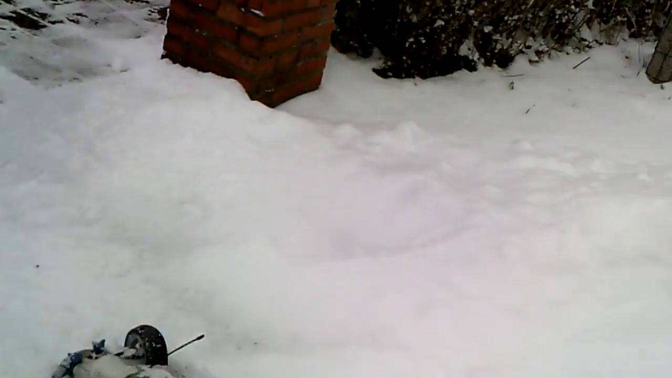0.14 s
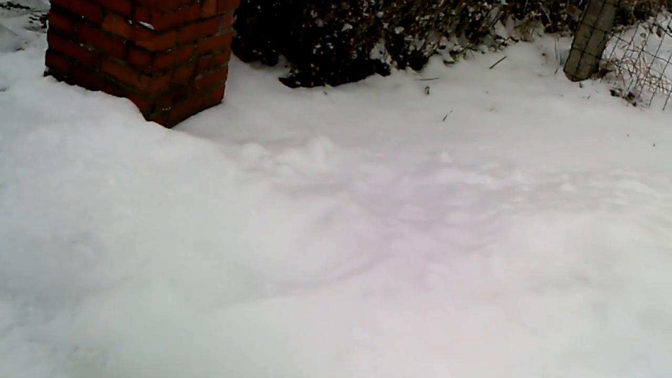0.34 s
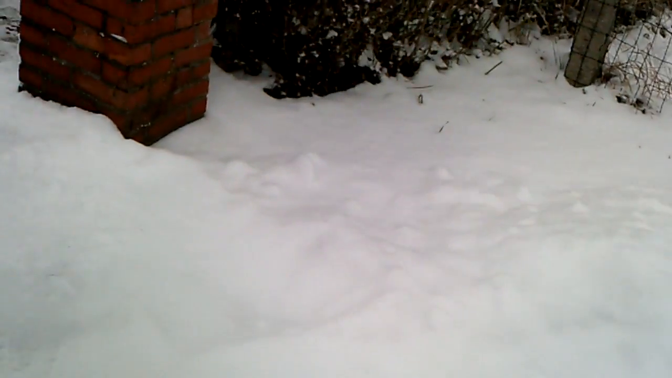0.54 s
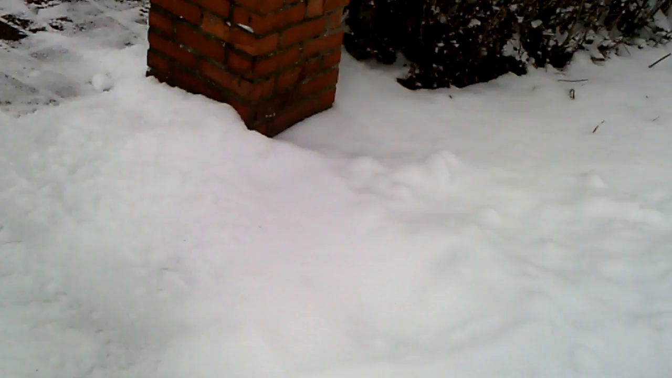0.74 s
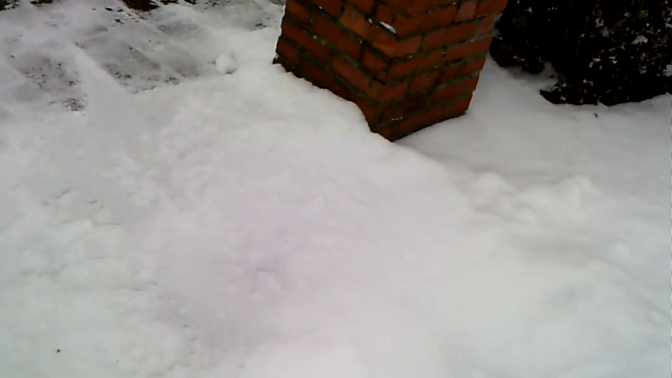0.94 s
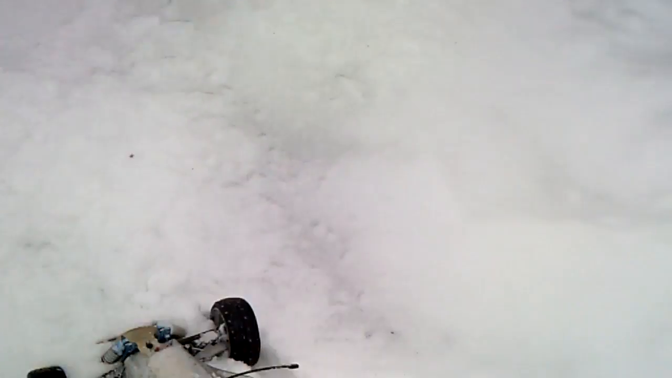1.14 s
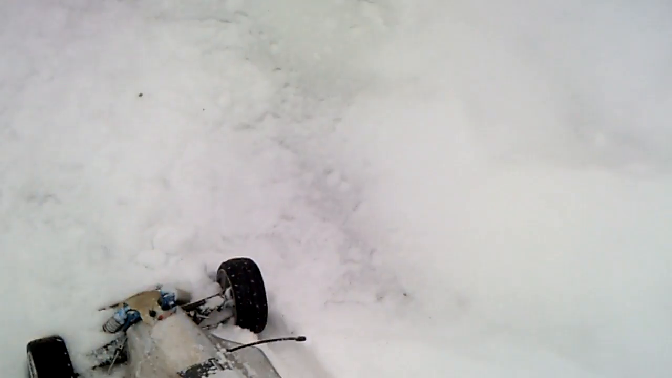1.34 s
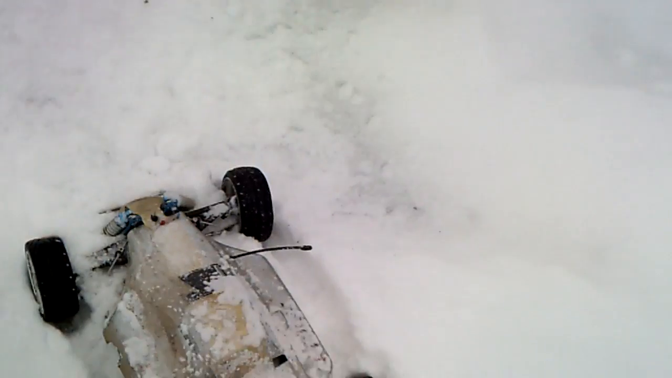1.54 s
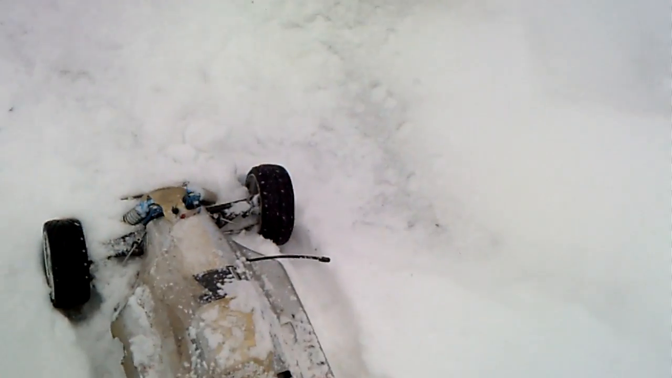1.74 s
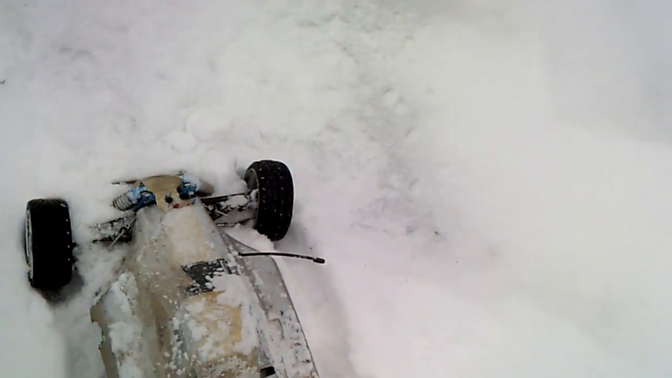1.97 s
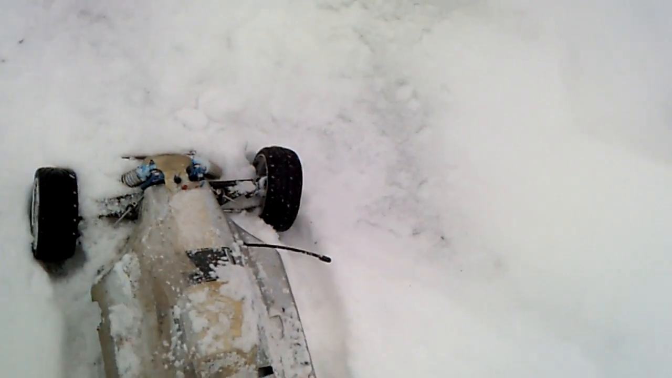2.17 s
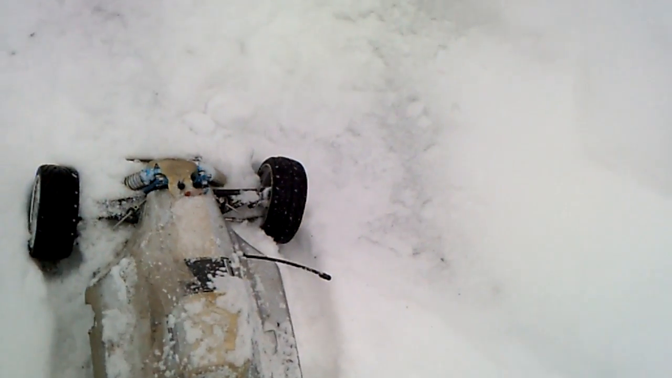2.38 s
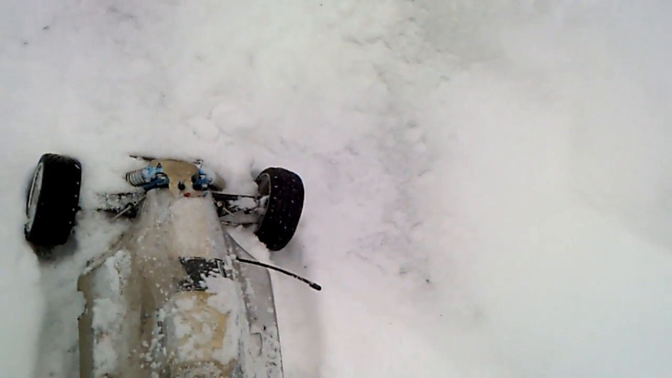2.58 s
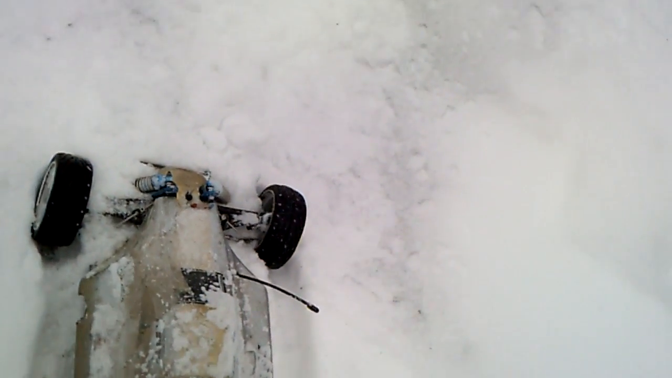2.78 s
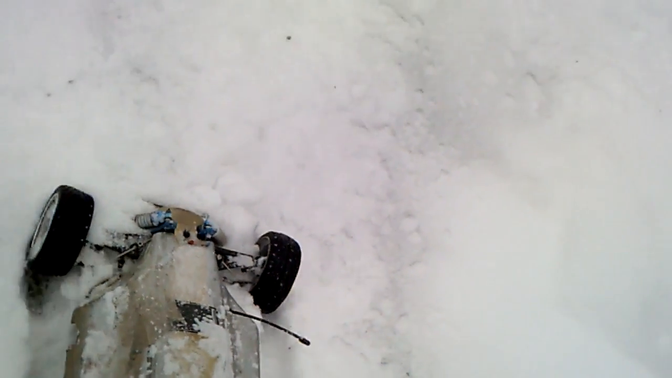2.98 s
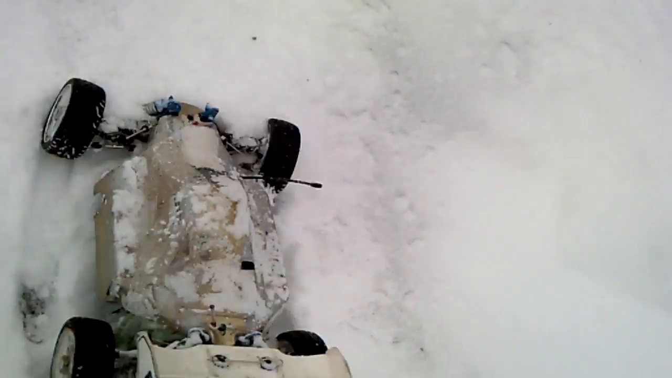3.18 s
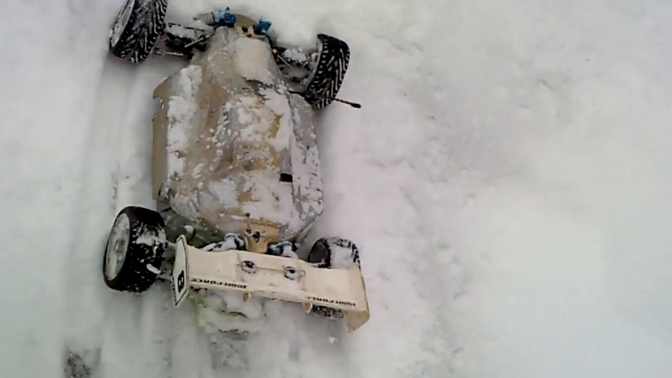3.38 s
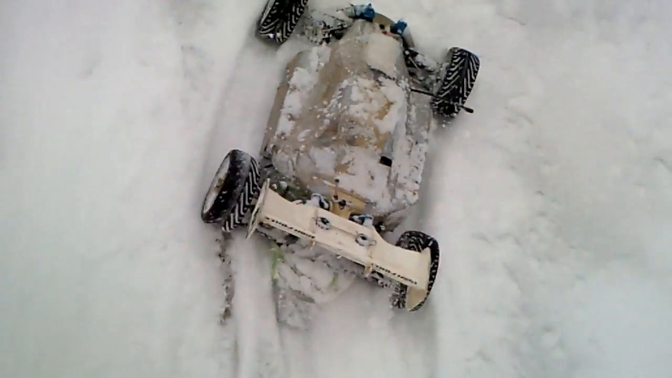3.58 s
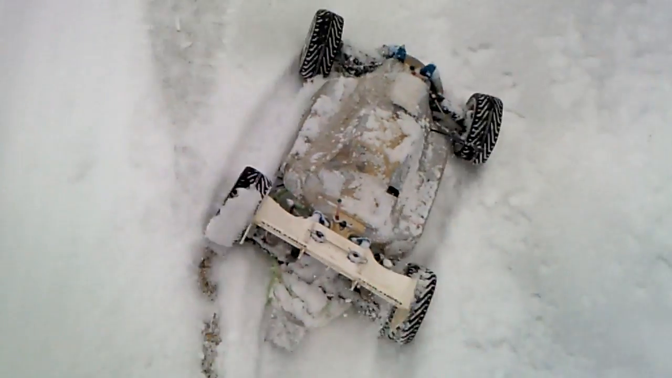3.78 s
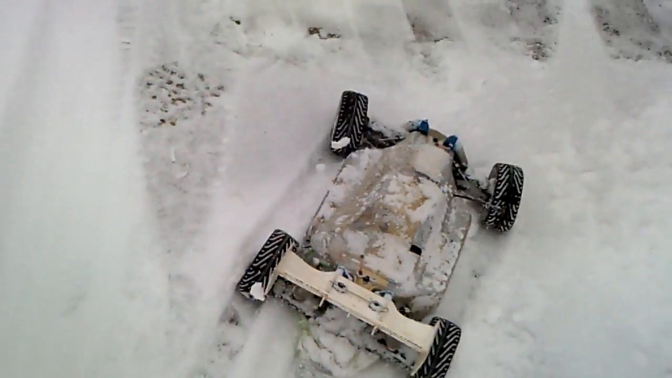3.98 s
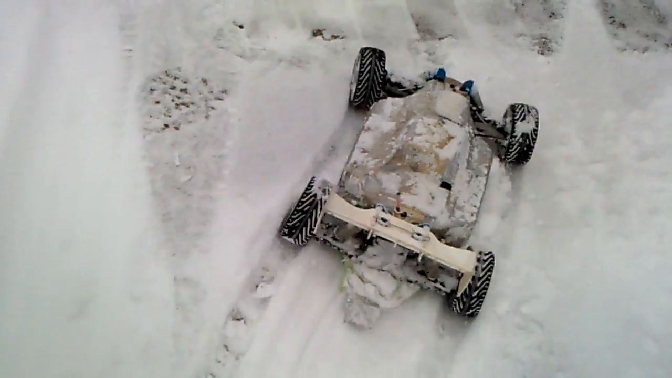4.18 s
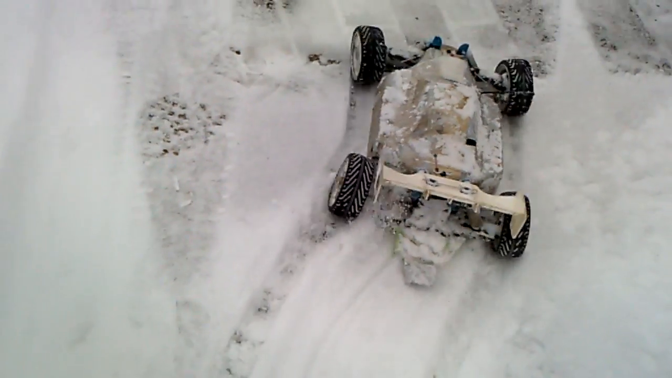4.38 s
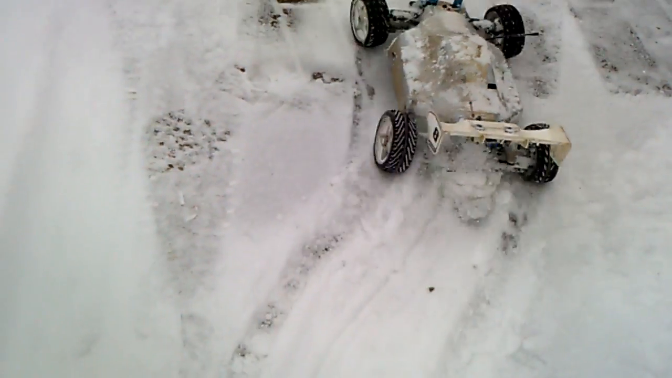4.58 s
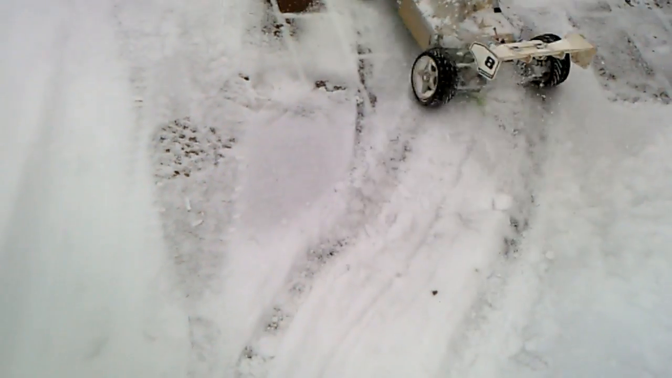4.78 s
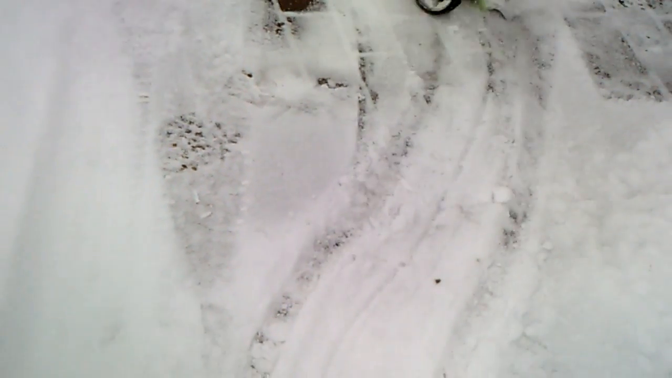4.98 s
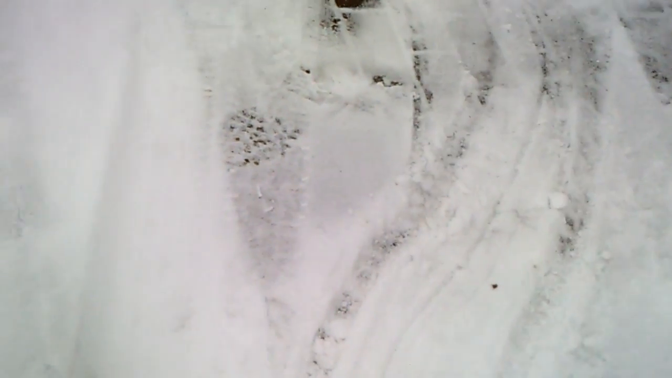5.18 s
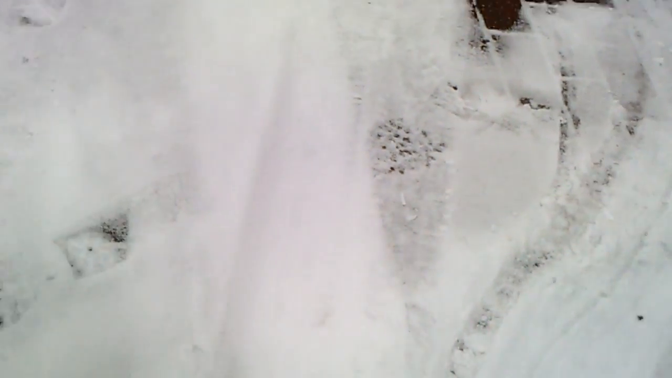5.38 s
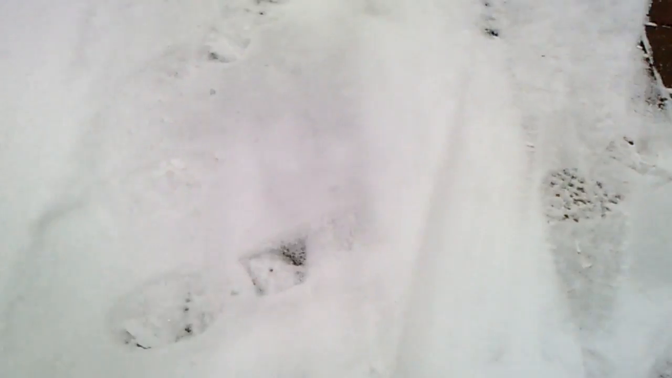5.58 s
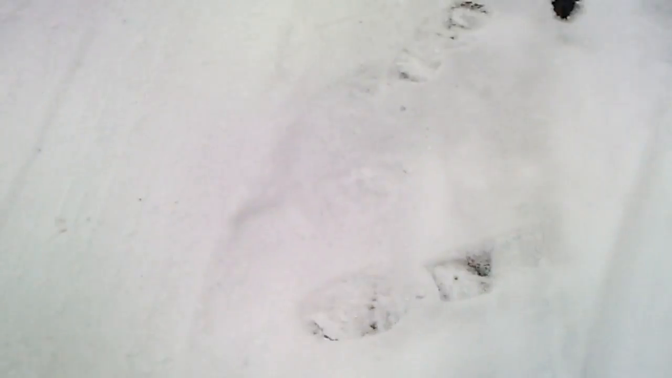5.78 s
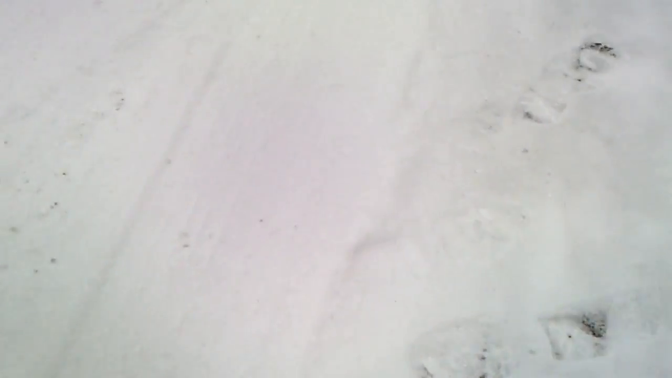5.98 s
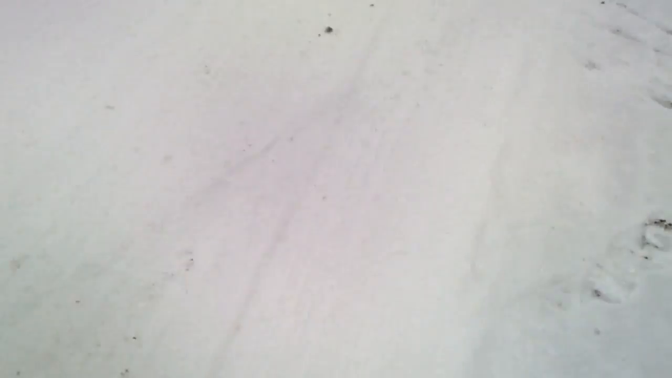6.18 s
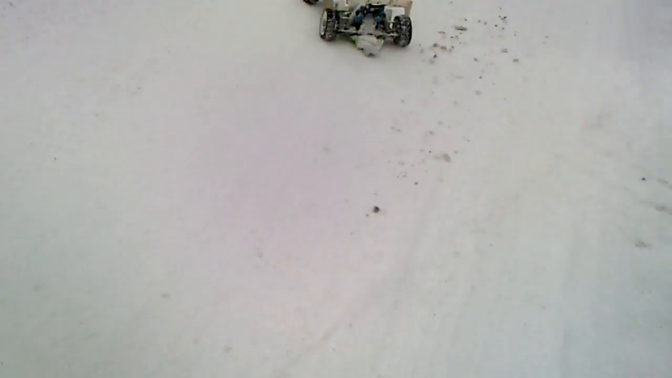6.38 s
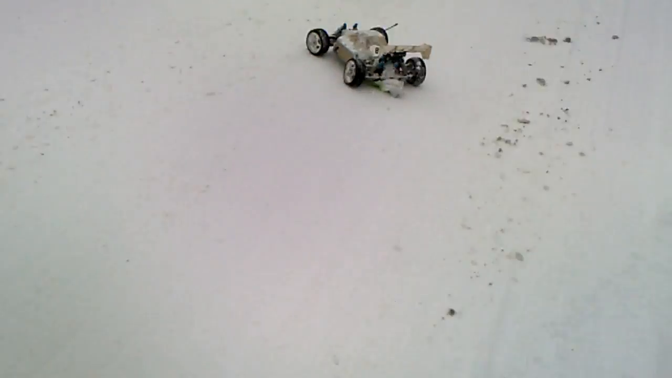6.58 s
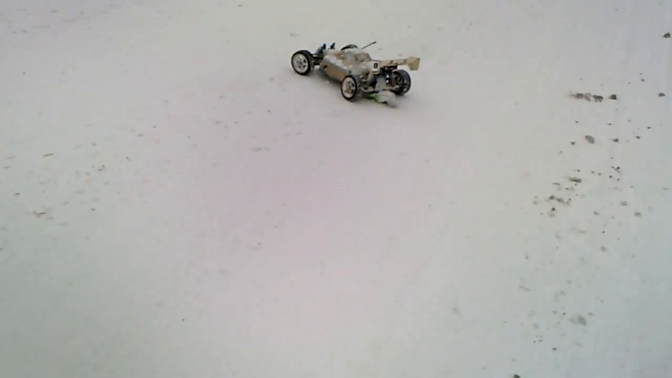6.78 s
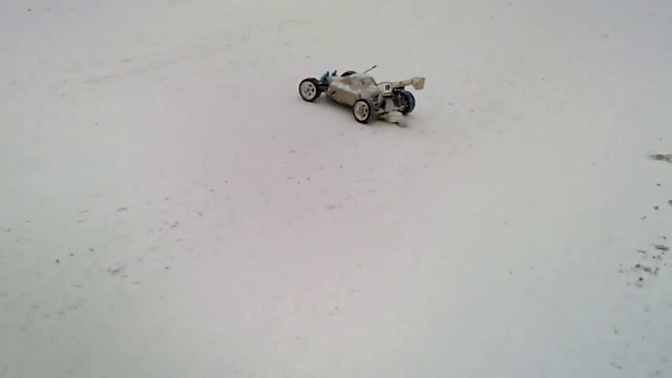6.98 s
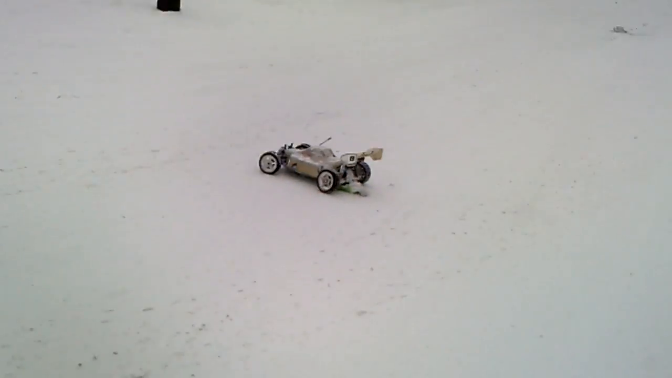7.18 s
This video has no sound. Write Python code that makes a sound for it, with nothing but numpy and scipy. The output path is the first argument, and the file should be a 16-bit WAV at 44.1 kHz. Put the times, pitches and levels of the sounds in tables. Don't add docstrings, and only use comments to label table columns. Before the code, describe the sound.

A small motor whirs down, pauses amid soft handling noises, then revs in gritty, clattering surges before racing off and fading to a thin whine.

```python
import sys
import numpy as np
from scipy import signal
from scipy.fft import rfft, irfft
from scipy.io import wavfile
from scipy.ndimage import uniform_filter1d

SR = 44100
rng = np.random.default_rng(int(sys.argv[2]) if len(sys.argv) > 2 else 0)


def wav_record(signal):
    frames = np.transpose(np.atleast_2d(signal))
    bounded = np.clip(frames, -1, 1)
    quanta = np.round(bounded * 32767).astype(np.int16)
    wavfile.write(sys.argv[1], SR, quanta)


def gain_from_db(level_db):
    decades = np.asarray(level_db, float) / 20
    return 10 ** decades


N = 318843


def rms_one(x):
    return x / np.sqrt(np.mean(x ** 2) + 1e-20)


def in_time(rows):
    s, *columns = np.transpose(rows)
    return [np.interp(np.arange(N) / SR, s, column) for column in columns]


def swells(rows):
    t = np.arange(N) / SR
    total = 0
    for middle_s, half_s, height in rows:
        from_middle = np.clip((t - middle_s) / half_s, -1, 1)
        total = total + height * np.cos(np.pi / 2 * from_middle) ** 2
    return total


def drift(per_s):
    r = np.exp(-32 * np.pi * per_s / SR)
    coarse = rng.standard_normal(N // 16 + 3002)
    slow = signal.lfilter([1], [1, -2 * r, r * r], coarse)[3000:]
    return rms_one(np.interp(np.arange(N) / 16, np.arange(len(slow)), slow))


def colour(x, spectrum):
    hz, db = np.transpose(spectrum)
    log_hz = np.log(np.fft.rfftfreq(N, 1 / SR) + 1)
    return rms_one(irfft(rfft(x) * gain_from_db(np.interp(log_hz, np.log(hz), db)), N))


def resonance(x, hz, width_hz):
    r = np.exp(-np.pi * width_hz / SR)
    top = np.array([1, 0, -1]) * (1 - r * r) / 2
    return signal.lfilter(top, [1, -2 * r * np.cos(2 * np.pi * hz / SR), r * r], x)


def narrow_band(x, hz, width_hz):
    return rms_one(resonance(resonance(x, hz, width_hz), hz, width_hz))


def body(x, modes):
    for hz, width_hz, db in modes:
        x = x + (gain_from_db(db) - 1) * resonance(x, hz, width_hz)
    return rms_one(x)


def add(out, start_s, sound):
    at = round(start_s * SR)
    out[at:at + len(sound)] += sound[:N - at]


def camera_noise():
    # pitch_hz, level_db per Hz
    hiss_colour = [(20, 4), (90, -8), (260, -11), (420, -6), (1400, -6.5), (2400, -11.5), (4600, -13.5),
                   (14500, -12.5)]
    # pitch_hz, width_hz, boost_db
    port = [(3080, 320, 5), (6000, 7100, 5.5)]
    # pitch_hz, width_hz, level_db
    hum_bands = [(50, 18, -73), (98, 6, -75), (166.4, 12, -74), (230.4, 6, -73), (299.6, 14, -77.5),
                 (8650, 120, -77)]
    white = rng.standard_normal(N)
    hum = sum(gain_from_db(db) * narrow_band(white, hz, width_hz) for hz, width_hz, db in hum_bands)
    hiss = body(colour(rng.standard_normal(N), hiss_colour), port)
    return gain_from_db(-52.7 + .5 * drift(3)) * hiss + hum


def rustle():
    # middle_s, half_length_s, level_db
    moves = [(0.532, 0.077, -51), (0.717, 0.15, -53.5), (1.216, 0.076, -76), (1.473, 0.69, -51.5),
             (1.92, 0.42, -59), (2.26, 0.085, -54), (3.076, 0.13, -57), (2.768, .05, -54),
             (3.207, 0.094, -50), (3.309, 0.057, -51), (3.43, 0.08, -46)]
    # pitch_hz, level_db per Hz
    grain_colour = [(150, -43), (250, -7), (381, -0.5), (600, -1), (1070, -0.5), (1220, 1.5), (1350, 0),
                    (4400, -6.5), (12000, -12), (15600, -50), (22000, -120)]
    grain_db = 1.3 * drift(40) + 1.8 * np.minimum(rng.exponential(1, N), 5)
    grains = rng.standard_normal(N) * gain_from_db(grain_db)
    loudness = swells([(s, half_s, gain_from_db(db)) for s, half_s, db in moves])
    return loudness * colour(grains, grain_colour)


def ticks():
    # start_s, peak_db, snap_t60_s (time to fall 60 dB), metal_ring_db
    snaps = [(0.238, -28, 0.01, -11), (0.7437, -36.5, 0.0072, 8.5), (0.757, -43, 0.0094, 5),
             (0.9415, -33, 0.0046, 5), (0.947, -34, 0.0085, -12), (2.283, -41, 0.0069, -7),
             (2.927, -44, 0.0091, -8), (3.189, -27, 0.0033, -12), (3.276, -40, 0.0038, -8),
             (3.493, -32, 0.01, -17), (3.526, -38, 0.012, -20), (5.0059, -14.5, 0.0073, -25)]
    # pitch_hz, level_db, t60_s
    metal = [(6150, -28, .09), (6500, -12, .025), (7400, -19, .035), (8150, -14, .035), (11850, -20, .05),
             (13250, -10, .035)]
    out, t = np.zeros(N), np.arange(3000) / SR
    bright = signal.butter(2, [3000, 12800], "band", fs=SR, output="sos")
    for start_s, db, t60, ring_db in snaps:
        burst = rng.standard_normal(len(t)) * gain_from_db(-60 * t / t60)
        sound = signal.sosfilt(bright, burst * np.minimum(t / 0.001, 1))
        for hz, mode_db, mode_t60 in metal:
            luck_db = rng.normal(0, 2.5)
            shake = 1.5 * np.cumsum(rng.normal(0, .06, len(t)))
            level = gain_from_db(ring_db + mode_db + luck_db - 60 * t / mode_t60)
            sound += level * np.sin(2 * np.pi * hz * t + shake)
        add(out, start_s, gain_from_db(db + 9.0) * sound)
    return out


def knocks(events, ring_s, snap_share, low_hz):
    out, t = np.zeros(N), np.arange(1000) / SR
    wall = signal.butter(2, [low_hz, 3200], "band", fs=SR, output="sos")
    for start_s, db, hz in events:
        ring = np.sin(2 * np.pi * hz * t) * np.exp(-t / ring_s)
        snap = signal.sosfilt(wall, rng.standard_normal(len(t)) * np.exp(-t / .0012))
        add(out, start_s + 0.00164, gain_from_db(db) * (ring + snap_share * snap / np.abs(snap).max()))
    return out


def hand_knocks():
    # start_s, peak_db, pitch_hz
    bumps_of_hand = [(0.76, -40, 1080), (0.837, -39, 1080), (0.872, -49, 570), (0.935, -46, 1740),
                     (1.013, -37.5, 1750), (1.094, -34, 398), (1.13, -44, 1000), (1.378, -31, 1040),
                     (1.436, -42, 1670), (1.48, -44, 1710), (2.046, -45, 1020), (2.385, -43, 950),
                     (2.97, -39.5, 790), (2.997, -43, 884), (3.178, -36, 1140), (3.358, -50, 900),
                     (3.13, -43, 793), (3.29, -44, 498), (2.78, -43, 409), (6.195, -29, 1080)]
    return knocks(bumps_of_hand, ring_s=.0024, snap_share=1.1, low_hz=280)


def drive_jolts():
    # start_s, peak_db, pitch_hz
    slack = [
        (0.005, -31, 2250),
        (3.4979, -31, 2700),
        (3.5279, -25, 2663),
        (3.5493, -26, 2640),
        (3.6142, -28, 2400),
        (3.6406, -31, 2420),
    ]
    return knocks(slack, ring_s=.002, snap_share=1.2, low_hz=800)


def panels():
    # middle_s, half_length_s, pitch_hz, width_hz, level_db
    loose = [
        (5.58, .2, 1090, 220, -37),
        (5.88, .22, 1200, 260, -37),
        (4.42, .1, 680, 160, -36),
        (4.8, .2, 720, 220, -36),
        (.08, .07, 650, 200, -38),
        (3.57, .07, 2650, 400, -39),
        (3.23, .09, 750, 400, -48),
        (6.62, .2, 4200, 200, -56),
        (6.9, .35, 5400, 250, -58),
        (6.15, .12, 1700, 400, -47),
    ]
    shaking = rng.standard_normal(N) * gain_from_db(2.0 * drift(35))
    out = np.zeros(N)
    for s, half_s, hz, width_hz, db in loose:
        out += swells([(s, half_s, gain_from_db(db))]) * narrow_band(shaking, hz, width_hz)
    return out


def drive():
    # start_s, mesh_hz, whine_db (tooth load), clatter_db (wheel effort), shaft_wobble_db
    stopping = [(0, 690, -41, -38, -7), (.025, 877, -25, -37.5, -6), (.07, 2147, -35.5, -32, 4.5),
                (.16, 1927, -48, -36, -3), (.185, 1538, -31.5, -33.5, -3), (.215, 1367, -44, -38.5, 8),
                (.24, 972, -28.5, -38.5, 9), (.29, 584, -56, -44.5, -11), (.37, 448.5, -85, -62, -9)]
    creeping = [(3.05, 452, -90, -60, -12), (3.12, 448, -78, -55, -12), (3.135, 448, -80, -52, -12),
                (3.172, 448, -78, -51, -12), (3.182, 448, -78, -45, -12), (3.23, 444, -80, -46.5, -12),
                (3.29, 438, -80, -47.5, -12), (3.345, 420, -85, -59, -12), (3.362, 411.6, -85, -48, -12)]
    digging_in = [(3.402, 384.7, -90, -52, -9), (3.46, 399.9, -54, -43, -3), (3.475, 619.8, -38, -41, -3),
                  (3.49, 990, -34, -37, -9), (3.501, 960, -26, -33, -9), (3.512, 701.5, -36, -37, -9),
                  (3.528, 1080, -30.5, -33, -11), (3.538, 830, -26, -33.5, -14),
                  (3.56, 1345, -31.5, -30.5, -6), (3.6, 1880, -33.5, -30, 4), (3.632, 1830, -34, -35, 0),
                  (3.681, 1386, -72, -37.5, -6), (3.72, 1047, -31, -40.5, -23)]
    second_try = [(3.77, 710.4, -32, -36.5, -18), (3.862, 541.5, -35, -39.5, -13),
                  (3.899, 847, -25.5, -33.5, -18), (3.938, 1523, -26, -33, -6), (4.039, 1648, -27, -34, -5),
                  (4.065, 1443, -31.5, -35.5, 4), (4.085, 1197, -46, -40, 5), (4.11, 1000, -35.5, -41.5, 5),
                  (4.15, 629, -28.5, -43, -2), (4.2, 594, -30, -39.5, -12)]
    wheelspin = [(4.219, 892, -26.5, -34, -3), (4.299, 1900, -30, -31.5, 6), (4.33, 2480, -38.5, -30, 7.5),
                 (4.38, 2583, -40, -34.5, -3), (4.449, 2410, -42, -33.5, 3.5),
                 (4.49, 2560, -31.5, -28.5, -2), (4.503, 2640, -35, -28.5, -1),
                 (4.528, 3710, -58, -27.5, -3), (4.612, 3423, -46, -31.5, 1.5),
                 (4.661, 2893, -74, -31.5, -10)]
    breaking_free = [(4.701, 2551, -38, -31, -2), (4.76, 2646, -41, -32, -4),
                     (4.829, 2952, -35, -32.5, -4.5), (4.89, 3006, -40, -30.5, -6.5),
                     (4.929, 2516, -44, -31.5, 2), (4.965, 2119, -37, -32, -2),
                     (4.995, 1653, -40, -33, -12), (5.02, 1293, -36, -34.5, -20),
                     (5.077, 1157, -28.5, -32.5, 2)]
    turning = [(5.11, 1508, -33, -30.5, -21), (5.15, 2090, -32.5, -31.5, 4.5), (5.18, 1455, -36, -33, -1.5),
               (5.205, 1463, -39, -33.5, -13), (5.24, 1007, -31.5, -38, -10), (5.279, 967.4, -34, -38, -15),
               (5.342, 1045, -30, -38, -11), (5.365, 1035, -21.5, -36, -3)]
    dash = [(5.4, 1841, -32, -30, -4.5), (5.44, 2484, -33.5, -34.5, -1.5), (5.5, 3580, -61, -32, -4),
            (5.581, 4184, -58, -34.5, 1.5), (5.72, 4423, -47, -33, -2.5), (6.05, 3894, -64, -38.5, 4),
            (6.075, 3486, -67, -40, -5), (6.271, 3210, -78, -47, -2), (6.36, 1475, -81, -50, -21)]
    cruising_off = [(6.42, 1298, -68, -49.5, -9), (6.45, 1394, -70, -44.5, -4.5),
                    (6.49, 1501, -45.5, -42, -13), (6.57, 1486, -50.5, -44, -4),
                    (6.72, 1288, -49.5, -45, 6), (6.79, 1117, -46.5, -46.5, -2),
                    (6.971, 1052, -51.5, -46, -3), (7.099, 1082, -47.5, -43, -1),
                    (7.23, 1040, -41.5, -47, -14)]
    return in_time(np.vstack([stopping, creeping, digging_in, second_try, wheelspin,
                              breaking_free, turning, dash, cruising_off]))


def whine(turns, db, rough, width_hz, wobble_db):
    steady = gain_from_db(wobble_db * drift(47.0)) * np.exp(.35j * drift(22))
    flutter = (drift(width_hz) + 1j * drift(width_hz)) / np.sqrt(2)
    mix = np.sqrt(1 - rough) * steady + np.sqrt(rough) * flutter
    return np.sqrt(2) * gain_from_db(db) * np.imag(mix * np.exp(2j * np.pi * turns))


def gears(mesh_hz, mesh_db, shaft_db):
    # pitch_hz, level_db
    radiation = [(200, -37), (380, -20.5), (600, -10), (750, -9.5), (1150, -9.5), (1900, -1), (2300, -3),
                 (3300, -36)]
    # pitch_hz, width_hz, boost_db
    gearbox = [(807, 62, 6.5), (1020, 100, 4), (1400, 220, 6.5), (2000, 88, 7.5), (2524, 56.2, 5.5)]
    # middle_s, half_length_s, change_db
    mesh_sings = [(.004, .012, -10), (.048, .014, -12), (.033, .008, 4), (.21, .018, -8), (.228, .012, 5),
                  (.262, .02, 6), (3.482, .01, -6), (3.514, .01, -8), (3.56, .014, -8), (4.225, .012, -6),
                  (4.315, .02, -6), (4.965, .04, 5), (5.195, .025, 4), (5.43, .015, 3), (5.46, .02, -8),
                  (6.56, .06, 2)]
    double_sings = [(5.225, 0.048, 17), (5.29, .04, 2), (3.55, 0.024, -8), (3.605, .03, 16), (3.88, .03, 4),
                    (5.33, 0.055, 4.5), (6.56, 0.11, 14), (3.98, 0.11, -2), (5.08, .05, 3),
                    (7.15, 0.095, 2), (3.8, 0.081, 9)]
    half_sings = [(5.52, 0.05, 8), (5.6, .06, 8), (5.75, 0.13, -10), (4.515, .025, -8), (4.6, 0.06, 4),
                  (6, 0.046, 3), (4.27, 0.041, 0), (3.58, .06, 2), (5.92, .12, -10), (6.01, .06, -8)]
    quarter_sings = [(4.33, .04, -1), (4.43, .1, 0), (4.94, 0.07, 6.5), (4.02, 0.046, -2), (4.25, 0.05, 7),
                     (6.5, 0.061, 3), (6.66, 0.035, 6), (3.5, .04, 4), (5.52, 0.065, -12), (5.8, 0.15, 5),
                     (4.62, 0.088, 1.5), (6.6, 0.24, 1.5), (4.75, 0.1, 7.5)]
    three_quarter_sings = [(4.81, 0.096, 16), (4.58, 0.14, -20), (6.445, 0.041, 34), (6.52, 0.036, 10),
                           (6.6, .06, -2), (6.2, 0.024, 14)]

    rough = np.clip((mesh_hz - 1600) / 2600, .14, .97)
    sweep = np.abs(uniform_filter1d(np.gradient(np.log2(mesh_hz)) * SR, size=900))
    judder = (0.011 + .004 * np.minimum(sweep, 9)) * drift(40)
    turns = np.cumsum(mesh_hz * (1 + judder)) / SR

    double_db = mesh_db - 6.5 - 2.2 * sweep + 2.5 * drift(8) + swells(double_sings)
    double_db = double_db + 0.21 * (mesh_db + 16.5)
    double_db = double_db - 8 * np.log2(np.maximum(mesh_hz / 1000, 1))

    mesh_db = mesh_db - 3.5 + swells(mesh_sings)
    for top_hz, width_hz, boost_db in gearbox:
        mesh_db = mesh_db + boost_db / (1 + ((mesh_hz - top_hz) / width_hz) ** 2)

    radiation_hz, radiation_db = np.transpose(radiation)

    def fraction_db(share, order_db, sings):
        heard_db = np.interp(np.log(mesh_hz * share), np.log(radiation_hz), radiation_db)
        return shaft_db + order_db + swells(sings) + heard_db + 2.0 * drift(15.6)

    quarter_db = fraction_db(1 / 4, -2.5, quarter_sings)
    half_db = fraction_db(1 / 2, -5, half_sings)
    three_quarter_db = fraction_db(3 / 4, -13.5, three_quarter_sings)

    out = whine(turns, mesh_db, rough, width_hz=170, wobble_db=2.5)
    out += whine(2 * turns, double_db + .6, .08 + .8 * rough, width_hz=110, wobble_db=2.5)
    out += whine(3 * turns, double_db - 16.5, 0.27, width_hz=190, wobble_db=7.0)
    out += whine(4 * turns, double_db - 11, 0.79, width_hz=120, wobble_db=5.0)
    out += whine(turns / 2, half_db + .6, .7 * rough, width_hz=70, wobble_db=3.0)
    out += whine(turns / 4, quarter_db + 5.5, 0.77 * rough, width_hz=64, wobble_db=3.5)
    out += whine(3 * turns / 4, three_quarter_db, .8 * rough, width_hz=90, wobble_db=3.5)
    return out, turns


def clatter(turns, surge_db, grit_db, shaft_depth):
    sizes = gain_from_db(grit_db * np.minimum(rng.exponential(1, N), 5))
    pulse = 1 + shaft_depth * np.cos(2 * np.pi * turns / 4)
    return rng.standard_normal(N) * sizes * gain_from_db(surge_db) * pulse


def shell(hits, count, swing_db, share):
    rings = 0
    for hz in 450 * 26 ** ((np.arange(count) + rng.random(count)) / count):
        ring = rms_one(resonance(hits, hz, 25 + 0.033 * hz))
        rings = rings + hz ** .25 * gain_from_db(swing_db * drift(3.05)) * ring
    return np.sqrt(1 - share) * rms_one(hits) + np.sqrt(share) * rms_one(rings)


def buggy():
    # start_s, ring_hz (a gliding noisy band), ring_db over bright clatter,
    # turned_away 0-1
    pose = [(0, 3690, 8, 0), (.3, 4120, -3, 0.28), (3.4, 4550, -19, 0.17), (3.6, 5148, 11.5, 0.16),
            (3.75, 3903, 7.5, 0), (4.0, 4884, 0, 0.22), (4.39, 5247, 5.5, 0.09), (4.69, 5075, 1.5, 0.27),
            (4.92, 4623, 7, 0.19), (5.13, 4220, -3, 0.69), (5.44, 3380, -8, 0.62), (5.55, 3863, 5, 0.85),
            (5.8, 4128, 7.5, 0.85), (6.02, 4112, 4.5, 0.84), (6.22, 4080, -38, 0.61),
            (6.48, 4195, -9, 0.77), (6.72, 4168, 2, 0.74), (7.23, 4526, -13, 0.55)]
    # middle_s, half_length_s, change_db of effort
    bumps = [(.04, 0.037, 2.5), (3.665, 0.012, 2.5), (4.4, 0.054, 0), (5.045, 0.031, -4.5),
             (6.04, 0.018, 2.5), (6.065, .015, -7.5), (6.09, .015, 3.5), (6.135, 0.019, 2.5),
             (6.18, 0.017, -5.5), (6.205, 0.019, 2), (6.26, 0.025, 2.5)]
    # middle_s, half_length_s, change_db
    muffled = [
        (3.25, .2, -10),
        (6.6, 0.26, 2.5),
        (6.35, .1, 3),
        (5.75, 0.37, 0.5),
        (7.8, 0.22, 1),
        (4.15, .08, -0.5),
        (3.8, .08, -0.5),
    ]
    # pitch_hz, level_db per Hz
    facing_colour = [(180, -23.5), (300, -14), (414, -26), (651, -5), (790, -5.5), (1580, -5), (1980, -14),
                     (2220, -10.5), (3600, -11.5), (4820, -5.5), (5940, -3), (7820, -4.5), (14200, -16.5)]
    # pitch_hz, level_db per Hz
    away_colour = [(180, -36), (300, -21), (471, -14), (639, -8), (867, -12), (1100, -2), (1570, -15),
                   (1850, -9), (2240, -11), (2630, -24), (4060, -13), (5000, -17), (7720, -14),
                   (14200, -23)]
    # pitch_hz,
    # width_hz, change_db
    clatter_modes = [(650, 42, 1), (1080, 33, 1), (1774, 44, 3), (7755, 480, 6.5), (10900, 1040, 4.5),
                     (11450, 570, -13)]
    # start_s, level_db
    whistle = [
        (3.8, -81),
        (3.898, -33.5),
        (4.9, -52),
    ]

    mesh_hz, mesh_db, low_db, wobble_db = drive()
    low_db = low_db + swells(bumps)
    out, turns = gears(mesh_hz, mesh_db, low_db + wobble_db)

    ring_hz, ring_db, away = in_time(pose)
    surge = drift(59)
    bright_db = low_db - 11 + 2.5 * np.log2(mesh_hz / 1500) + 5 * away + swells(muffled)
    hits = clatter(turns, 0.7 * surge + 1.6 * drift(60), grit_db=1.8, shaft_depth=0.15)
    hits = shell(hits, count=44, swing_db=6.0, share=.36)
    side_on, tail_on = colour(hits, facing_colour), colour(hits, away_colour)
    for kind, db in (("low", low_db), ("high", bright_db + 3.0)):
        split = signal.butter(4, 2800, kind, fs=SR, output="sos")
        facing = rms_one(signal.sosfilt(split, side_on))
        tail = rms_one(signal.sosfilt(split, tail_on))
        out += gain_from_db(db) * body((1 - away) * facing + away * tail, clatter_modes)

    ring_turns = np.cumsum(ring_hz * (1 + .05 * (1 - away) * drift(25))) / SR
    ring_level_db = bright_db + ring_db - 5.0 + 1.8 * surge
    out += whine(ring_turns, ring_level_db, 0.9, width_hz=230, wobble_db=0)

    whistle_db, = in_time([(3.75, -46.5)] + list(whistle) + [(4.95, -99)])
    whistle_db = whistle_db - 10 + .5 * (bright_db + 40)
    whistle_turns = 5921 * np.arange(N) / SR
    return out + whine(whistle_turns, whistle_db, .8, width_hz=45, wobble_db=4)


def scene():
    car = buggy()
    no_rumble = signal.butter(2, 220, "high", fs=SR, output="sos")
    taps = signal.sosfilt(no_rumble, hand_knocks() + drive_jolts())
    lag = round(0.016 * SR)
    late_car = np.concatenate([np.zeros(lag), car[:-lag]])
    echo = signal.lfilter([.4], [1, -.6], late_car)
    mix = car + gain_from_db(-19.5) * echo + rustle() + taps + ticks() + camera_noise() + panels()
    return mix[None]


def low_pass(x):
    return signal.sosfilt(signal.butter(12, 15260, fs=SR, output="sos"), x)


def record(dry):
    cut = signal.cheby2(16, 45, 14200, fs=SR, output="sos")
    mix = signal.sosfilt(cut, dry)
    return low_pass(mix)


dry = scene()
out = record(dry)
wav_record(out)
```